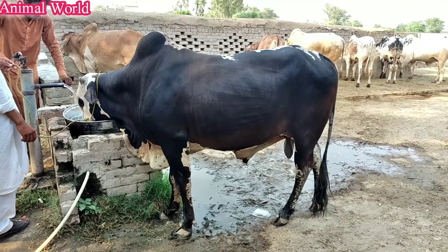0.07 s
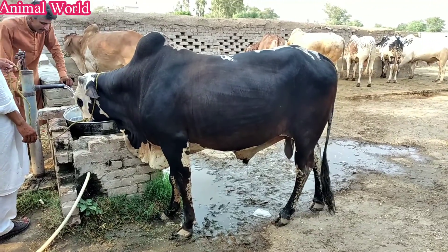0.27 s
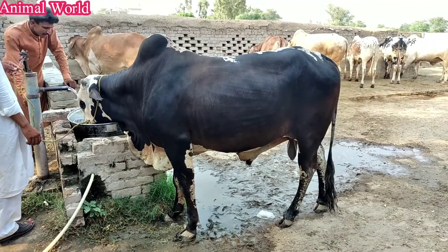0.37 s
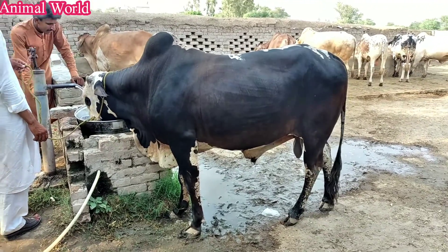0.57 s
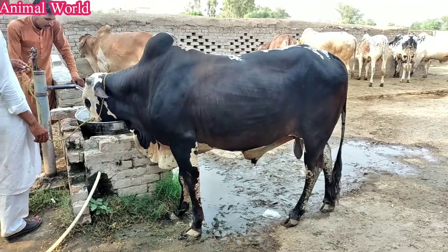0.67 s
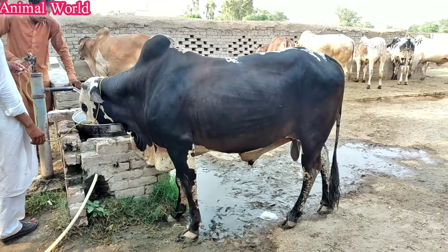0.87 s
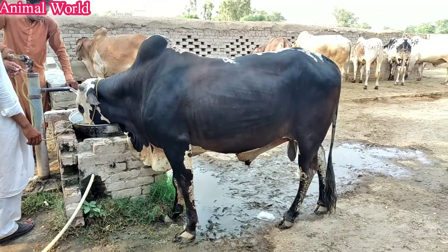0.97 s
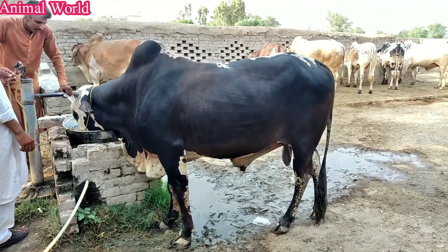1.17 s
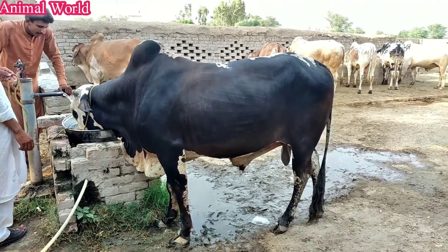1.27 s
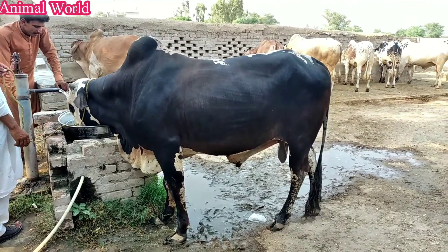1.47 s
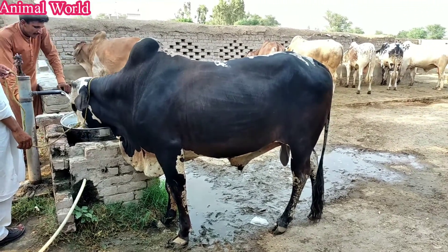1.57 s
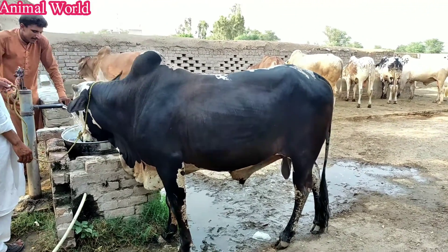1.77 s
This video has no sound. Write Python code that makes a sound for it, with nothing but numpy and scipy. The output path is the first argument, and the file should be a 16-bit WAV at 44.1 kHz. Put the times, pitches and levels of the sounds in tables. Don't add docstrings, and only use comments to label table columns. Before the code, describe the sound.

Close phone stereo pickup of a loose iron pump handle: a dense hard clank, a shorter knock, then another clattering run, mixed with soft bubbling gulps from a bowl, over a quiet low outdoor murmur.

```python
import sys
import numpy as np
from scipy import signal
from scipy.fft import rfft, irfft
from scipy.io import wavfile
from scipy.ndimage import uniform_filter1d

SR = 44100
rng = np.random.default_rng(int(sys.argv[2]) if len(sys.argv) > 2 else 0)


def natural_amplitude(level_db):
    exponent = np.asarray(level_db, float) / 20
    return 10 ** exponent


def materialize(psi):
    bounded = np.clip(np.atleast_2d(psi).T, -1, 1)
    quanta = np.round(bounded * 32767).astype(np.int16)
    wavfile.write(sys.argv[1], SR, quanta)


N = 79380
LAG_S = 0.00023

# t/s, clank peak level/dB, ring level/dB, t60/s
BLOWS = [(0.112, -44.5, -42.5, 0.13), (0.128, -29, -29.5, 0.234), (0.176, -25, -32, 0.21),
         (0.21, -15, -18, 0.14), (0.223, -15.5, -19, 0.18), (0.236, -15.5, -15.5, 0.13),
         (0.242, -4, -28.5, 0.082), (0.243, -10, -13, 0.13), (0.261, -19.5, -38, 0.033),
         (0.279, -9.5, -40, 0.07), (0.291, -30, -38, 0.18), (0.556, -28, -42, 0.21),
         (0.638, -28.5, -30.5, 0.1), (0.779, -28.5, -60.5, 0.14), (0.823, -32.5, -37, 0.14),
         (0.857, -34, -34.5, 0.18), (0.886, -24, -30.5, 0.039), (0.894, -12, -20.5, 0.18),
         (0.905, -14.5, -9.5, 0.016), (0.944, -14.5, -24, 0.037), (1.166, -36.5, -44.5, 0.42),
         (1.232, -23.5, -31.5, 0.24), (1.271, -18, -30, 0.13), (1.285, -9, -33.5, 0.08),
         (1.296, -13, -23.5, 0.1), (1.313, -17, -35.5, 0.092), (1.333, -19.5, -28, 0.045)]


def evened(x):
    return x / np.sqrt(np.mean(x ** 2) + 1e-20)


def read(points, hz):
    f, value = np.transpose(points)
    return np.interp(np.log(hz + 1), np.log(f + 1), value)


def add(mix, s, sound):
    part = mix[round(s * SR):][:len(sound)]
    part += sound[:len(part)]


def colour(x, points):
    gain = natural_amplitude(read(points, np.fft.rfftfreq(N, 1 / SR)))
    return irfft(rfft(x) * evened(gain), N)


def hump(u, peak):
    return np.sin(np.pi * u ** (np.log(0.5) / np.log(peak)))


def bursts(times, levels_db, decays, rises):
    grit_s, grit_db, same = 0.0015, 2, 0.35
    power, t = np.zeros(N), np.arange(SR // 2) / SR
    for s, db, t60, rise in np.broadcast(times, levels_db, decays, rises):
        attack = np.minimum(t / max(rise, 1 / SR), 1)
        add(power, s, (attack * natural_amplitude(db - 60 * t / max(t60, 0.01))) ** 2)
    roughness = evened(uniform_filter1d(rng.standard_normal(N), size=round(grit_s * SR)))
    a, b = rng.standard_normal((2, N))
    stereo = np.array([a, same * a + np.sqrt(1 - same ** 2) * b])
    return np.sqrt(power) * evened(natural_amplitude(grit_db * roughness) * stereo)


def clank():
    # f/Hz, level/dB
    iron = [(760, -8), (1300, 2), (2150, 0), (2490, 2), (3400, -8), (4200, -11.5), (5850, -35),
            (9900, -120)]
    thud = [(60, -17.5), (250, -10.5), (700, -5)]
    s, db, _, t60 = np.transpose(BLOWS)
    rise = 0.003 + 0.1 * np.maximum(t60 - 0.12, 0)
    return natural_amplitude(-12) * colour(bursts(s, db, t60, rise), list(thud) + list(iron[1:]))


def handle_ring():
    # f/Hz, level/dB, share of the blow's t60
    bar_modes = [(1068, -1, 0.57), (896, -16.5, 0.95), (1224, -9, 0.4), (2440, -30.5, 0.26)]
    out, t = np.zeros(N), np.arange(SR // 3) / SR
    hz, mode_db, share = np.transpose(bar_modes)[:, :, None]
    s, _, ring_db, t60 = np.transpose(BLOWS)
    luck = rng.standard_normal((len(s), len(bar_modes), 2)) * (mode_db < mode_db.max())
    for at, level_db, fade, draw in zip(s, ring_db, t60, luck):
        turns = hz * (1 + 0.025 * draw[:, 1:]) * (t + round(at * SR) / SR)
        fall = natural_amplitude(mode_db + 1.6 * draw[:, :1] - 60 * t / (share * fade))
        modes = fall * np.sin(2 * np.pi * turns)
        add(out, at, natural_amplitude(level_db + 5) * np.minimum(t / 0.0028, 1) * modes.sum(0))
    return out


def pin():
    # t/s, peak level/dB, t60/s, brightness/dB, rise/s
    rattles = [(0.0014, -49.5, 0.23, -25.5, 0.002), (.112, -49.5, 0.093, -30, .008),
               (0.1258, -38.5, 0.24, -20, 0.0035), (0.175, -32.5, 0.14, -19.5, 0.011),
               (0.2081, -24, 0.096, -17.5, 0.0018), (0.223, -24.5, 0.087, -31, 0.0062),
               (0.239, -17.5, 0.061, -21.5, 0.0023), (0.2812, -32, 0.065, -30.5, 0.0024),
               (.524, -57, 0.067, -30, .004), (0.557, -48.5, 0.29, -25, 0.005),
               (0.591, -45.5, 0.2, -21, 0.013), (0.7696, -42, 0.28, -25.5, 0.0075),
               (0.827, -39, 0.14, -15.5, .004), (0.8567, -29.5, 0.048, -23, 0.0041),
               (0.88, -29.5, 0.07, -24.5, 0.011), (0.8915, -19, 0.079, -19, 0.0041),
               (.92, -36.5, .08, -14.5, .008), (0.939, -26.5, 0.072, -20.5, 0.0064),
               (0.98, -47.5, 0.17, -22, 0.0083), (1.02, -56, 0.13, -26, 0.0085),
               (1.147, -49.5, 0.45, -41.5, 0.025), (1.1817, -46, 0.24, -22, 0.006),
               (1.2307, -26, 0.088, -19.5, 0.0048), (1.257, -24, 0.096, -19, 0.019),
               (1.276, -23, 0.065, -24, 0.0083), (1.289, -23, 0.041, -34, 0.0043),
               (1.32, -41.5, 0.1, -28, .008)]
    # f/Hz, level/dB
    body = [(1760, -22), (2600, -11), (3300, -24), (4600, -8.5), (5100, -6), (6620, -4.5), (9500, -21),
            (12400, -49.5)]
    fizz = [(7500, -37.5), (9500, 2.5), (11600, -1), (12600, -28.5), (16000, -41.5)]
    sparkle = [(10500, -39), (12500, 4.5), (14500, -7), (16000, -5)]
    s, db, t60, bright_db, rise = np.transpose(rattles)
    out = natural_amplitude(-4.5) * colour(bursts(s, db, t60, rise), body)
    out = out + colour(bursts(s, db + bright_db, t60, rise), fizz)
    return out + natural_amplitude(13.5) * colour(bursts(s, db + 2.08 * bright_db, t60, rise), sparkle)


def gulps():
    # t/s, level/dB, start f/Hz, length/s, pitch rise as a share
    pockets = [(.13, -46, 392, .034, 0.01), (.18, -36, 438, 0.084, 0.32), (.222, -35, 200.5, 0.022, -.3),
               (.23, -34, 124.5, .035, 0.16), (.238, -35, 297, 0.025, 0.25), (.245, -28, 402, 0.018, .1),
               (.255, -39, 193.5, 0.039, 0.34), (.268, -31.5, 410, 0.012, -0.26),
               (.27, -33.5, 498, 0.027, -0.23), (.28, -33.5, 324, 0.03, -.05),
               (.295, -41, 470.6, 0.03, 0.11), (.303, -49, 299, 0.015, 0.08),
               (.325, -47.5, 299.4, 0.028, -0.093), (.35, -52, 308.2, 0.029, 0.014),
               (.565, -41, 354, .05, .01), (.638, -34.5, 400, .019, 0.15), (0.664, -44.5, 390, 0.022, 0.11),
               (.78, -45, 349, 0.0451, -.05), (.828, -53, 347, 0.027, -0.029),
               (.85, -48.5, 331.4, 0.054, -.05), (.897, -32, 391, 0.028, .2), (.92, -46, 344, 0.0089, -.2),
               (.932, -35.5, 476.6, 0.025, -0.12), (1.163, -46.5, 395, 0.065, 0.017),
               (1.232, -36, 357, 0.023, 0.4), (1.248, -37, 455.8, 0.058, 0.17),
               (1.285, -37, 151, 0.021, -0.0043), (1.288, -27.5, 335.3, 0.037, 0.13),
               (1.288, -33, 236.3, 0.038, .15), (1.304, -32.5, 265, 0.0205, .05),
               (1.32, -34, 284, 0.047, -0.042), (1.315, -27.5, 372, 0.026, 0.028),
               (1.33, -35.5, 499.4, 0.036, 0.019), (1.392, -47, 265.6, .04, 0.022),
               (1.597, -42.5, 179.7, 0.0096, -0.015), (1.613, -45, 197, 0.013, -0.095),
               (1.776, -55, 284.3, 0.037, -0.013), (.871, -51.5, 55.4, 0.099, -0.041),
               (1.3, -48, 55.5, .054, 0.022)]
    # f/Hz, level/dB
    slosh = [(120, -32.5), (250, 1.5), (650, -3.5), (1000, -20.5), (3000, -91.5)]
    wobble, rough = 0.045, 0.34
    chance = uniform_filter1d(uniform_filter1d(rng.standard_normal((2, N)), size=150), size=120)
    waver = evened(chance[0] - uniform_filter1d(chance[0], size=900))
    flutter = evened(chance[1])
    out = np.zeros(N)
    for s, db, hz, length, glide in pockets:
        start = round(s * SR)
        u = np.arange(0, 1, 1 / (SR * length))[:N - start]
        cut = slice(start, start + len(u))
        pitch = hz * (1 + glide * u + wobble * waver[cut])
        swell = hump(u, 0.3) ** 0.57 * (1 + rough * flutter[cut])
        add(out, s, natural_amplitude(db) * np.sqrt(2) * swell * np.sin(2 * np.pi * np.cumsum(pitch) / SR))
    out = signal.sosfilt(signal.butter(4, 1500, fs=SR, output="sos"), out)
    churn = uniform_filter1d(abs(out), size=300) * rng.standard_normal(N)
    return out + natural_amplitude(-9.5) * colour(churn, slosh)


def chirps():
    # t/s, length/s, level/dB, f/Hz
    squeaks = [(0.207, 0.0053, -20.5, 763), (.243, 0.023, -39, 820), (0.556, .01, -39, 2122),
               (.559, 0.0036, -32, 2890), (0.595, .012, -40, 2950), (0.608, 0.0061, -39.5, 3100),
               (.615, 0.013, -41.5, 1030), (0.637, 0.0054, -35.5, 1960), (0.771, 0.0036, -58, 11450),
               (.772, .003, -64, 14300), (.778, 0.016, -48, 805), (.78, 0.016, -39, 2600),
               (0.811, 0.015, -45.5, 2540), (0.827, 0.0041, -35, 11430), (0.823, .003, -55, 13300),
               (0.83, .003, -50, 15400), (.832, .01, -63, 14200), (0.889, 0.019, -34.5, 892),
               (0.991, 0.018, -44.5, 870), (1.021, 0.0093, -51, 5220), (1.5, .065, -77, 12250)]
    out = np.zeros(N)
    for s, length, db, hz in squeaks:
        t = np.arange(0, length, 1 / SR)
        tone = np.sin(2 * np.pi * hz * t * (1 + 0.076 * t))
        add(out, s, natural_amplitude(db) * hump(t / length, 0.25) * tone)
    return out


def walls(x):
    # f/Hz, t60/s
    decay = [(400, 0.26), (2000, 0.17), (4000, 0.14), (6000, 0.29), (10000, 0.33)]
    taps = np.zeros((2, SR // 2))
    at = np.arange(100, SR // 2 - 20, 20)
    at = at + rng.integers(0, 20, (2, len(at)))
    np.put_along_axis(taps, at, rng.choice([-1., 1.], at.shape), 1)
    hz, t, z = signal.stft(taps, SR, nperseg=256)
    fall = natural_amplitude(-60 * t / read(decay, hz)[:, None])
    tail = signal.istft(z * fall, SR, nperseg=256)[1]
    return signal.fftconvolve(x, tail / np.linalg.norm(tail[0]), axes=1)[:, :N]


def ports(x):
    # f/Hz, left minus right level/dB
    tilt = [(60, 1), (500, -1), (1070, 1.5), (2200, 0.5), (3300, 5), (6200, 10), (8500, -1), (13000, -10.5)]
    # f/Hz, left lead/rad
    twist = [(1600, 0.0258), (2500, 2.9), (4200, 0.12)]
    hz = np.fft.rfftfreq(N, 1 / SR)
    half_db = read(tilt, hz) / 2
    lead = read(twist, hz) - 2 * np.pi * hz * LAG_S
    return irfft(rfft(x) * [natural_amplitude(half_db) * np.exp(1j * lead), natural_amplitude(-half_db)], N)


def yard():
    # f/Hz, level/dB
    rumble = [(22, -8.5), (50, 7.5), (85, -6)]
    murmur = [(76, -50), (130, -12.5), (272, -5), (435, -6.5), (897, -2), (1720, -8), (3600, -32),
              (4680, -75), (7920, -120)]
    hiss = [(4500, -35), (7000, -50), (11500, -58), (13000, -72.5)]
    # t/s, level/dB
    bustle = [
        (1.68, -4),
        (1.73, 1),
        (1.8, -3.5),
    ]
    # f/Hz, likeness
    likeness = [(60, 0.97), (950, 0.49), (15000, 0.06)]
    frames, hz = N // 256 + 5, np.fft.rfftfreq(1024, 1 / SR)
    a, b, c, d, patches = rng.standard_normal((frames, 513, 5)).T
    patches = evened(uniform_filter1d(uniform_filter1d(patches, size=8, axis=0), size=8, axis=1))
    same = np.clip(read(likeness, hz), -1, 1)[:, None]
    left, other = a + 1j * b, c + 1j * d
    late = np.exp(-2j * np.pi * hz * LAG_S)[:, None]
    z = np.array([left * late, same * left + np.sqrt(1 - same ** 2) * other])
    stir_db = np.interp(np.arange(frames) * 256 / SR, *np.transpose(bustle))
    spectrum_db = read(list(rumble) + list(murmur[1:-2]) + list(hiss), hz)[:, None]
    z *= natural_amplitude(spectrum_db + 2.2 * patches + stir_db)
    return natural_amplitude(-54) * evened(signal.istft(z, nperseg=1024, noverlap=768)[1][:, :N])


def scene():
    iron = pin() + clank()
    ring, water = handle_ring(), gulps()
    echo = walls(natural_amplitude(-8.5) * iron + natural_amplitude(-12) * water + natural_amplitude(-16.5) * ring)
    return ports(iron + ring + water + chirps() + echo) + yard()


def band_limit(x):
    return signal.sosfilt(signal.butter(12, 16500, fs=SR, output="sos"), x)


def power_db(power):
    return 10 * np.log10(abs(power) + 1e-20)


def record(dry):
    gate_db, pass_db, faint_db, cut_db = -85.5, -81, -101, -10
    hz, t, z = signal.stft(dry, SR, nperseg=512, noverlap=384)
    power = uniform_filter1d((abs(z) ** 2).mean(0), size=5, axis=1)
    treble = power[(hz > 4500) & (hz < 9000)].mean(0)
    quiet = np.clip(gate_db - power_db(treble), 0, 1)
    quiet = quiet * np.clip((pass_db - power_db(power)) / 2, 0, 1)
    around = uniform_filter1d(power, size=15, axis=0)
    faint = np.clip((faint_db - power_db(around)) / 2, 0, 1)
    shut = np.maximum(quiet, faint) * (hz > 3300)[:, None]
    z = z * natural_amplitude(cut_db * shut) * (hz < 16000)[:, None]
    gated = signal.istft(z, SR, nperseg=512, noverlap=384)[1][:, :N]
    return band_limit(gated)


dry = scene()
out = record(dry)
materialize(out)
```